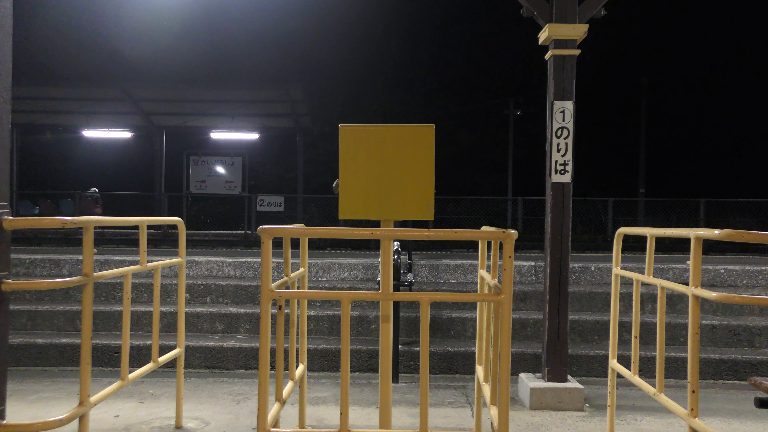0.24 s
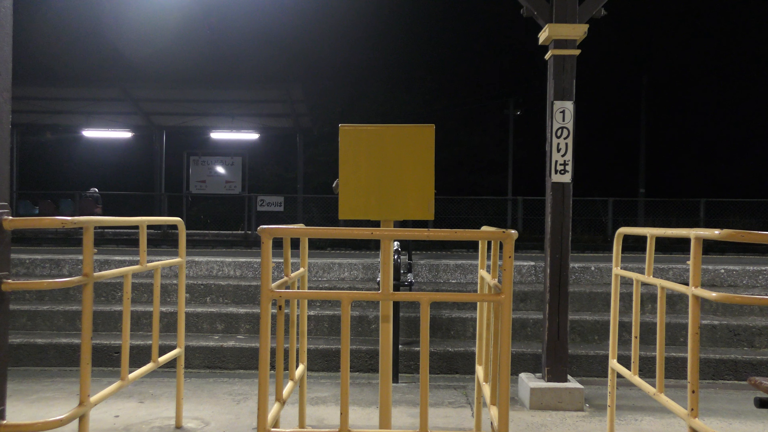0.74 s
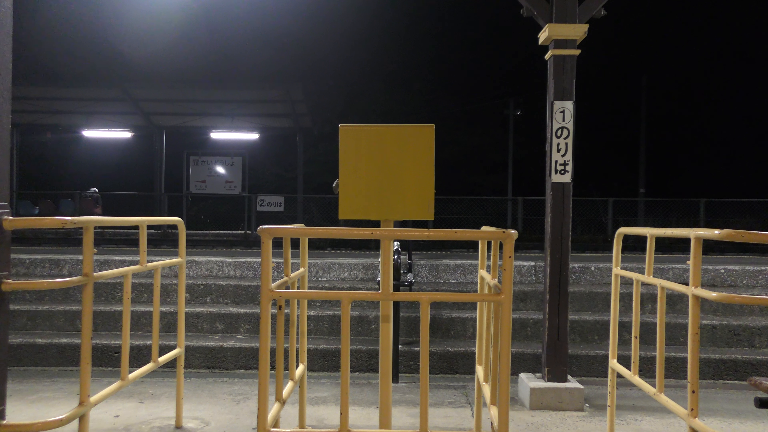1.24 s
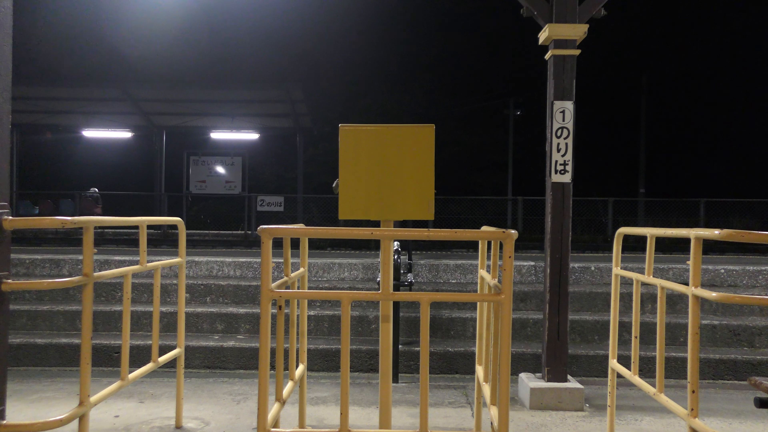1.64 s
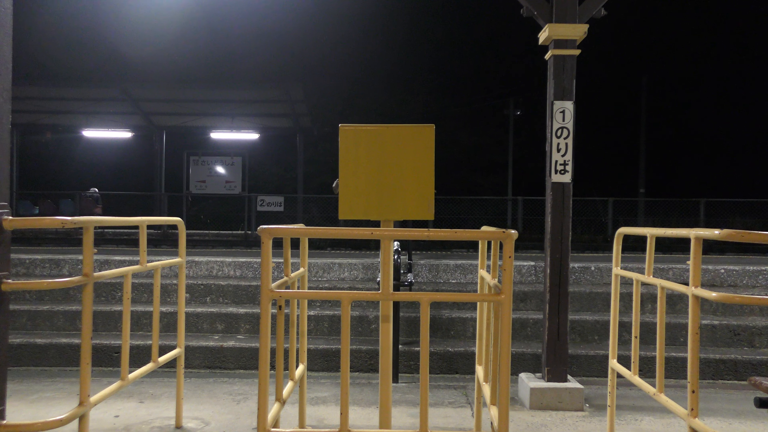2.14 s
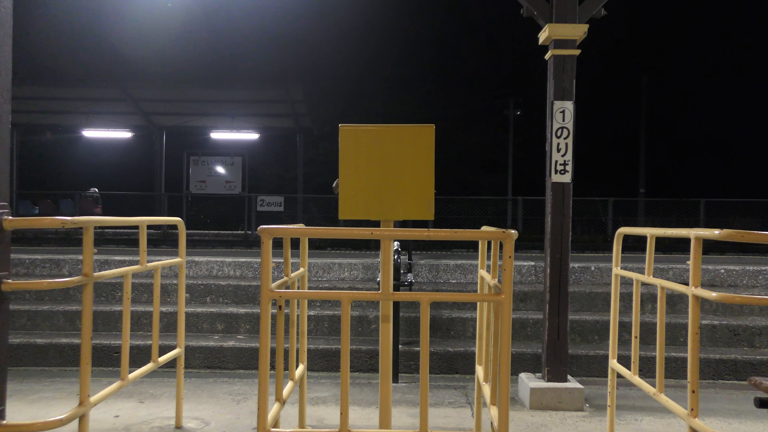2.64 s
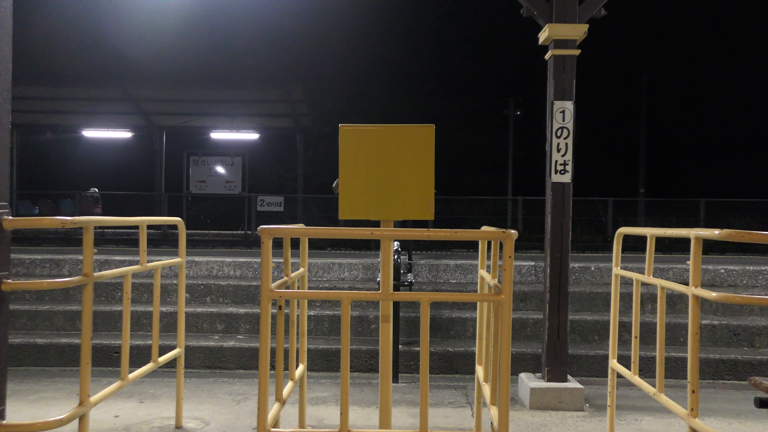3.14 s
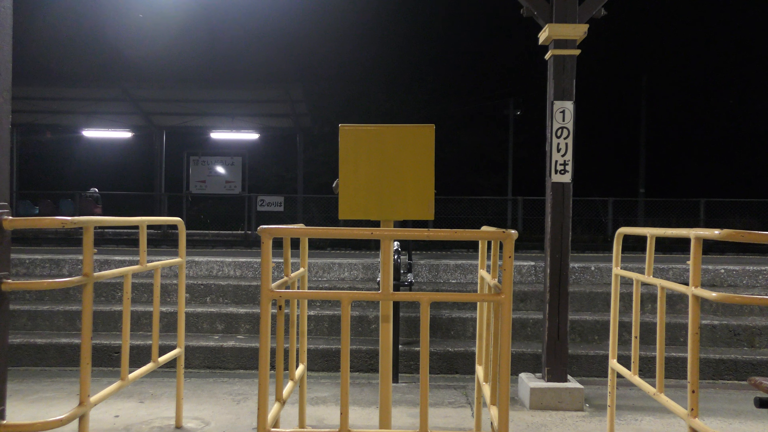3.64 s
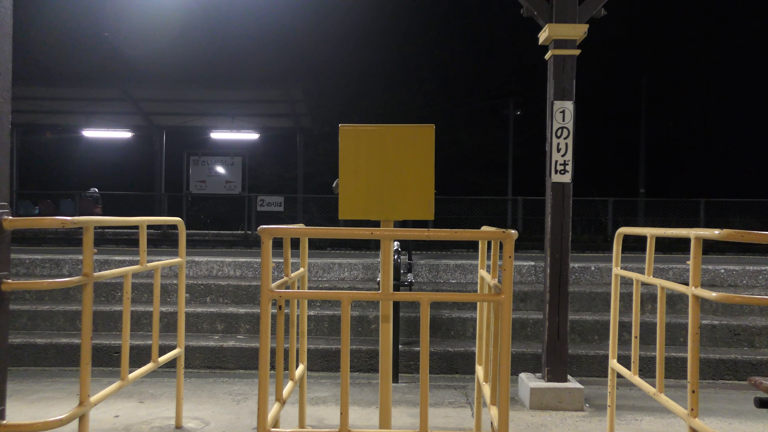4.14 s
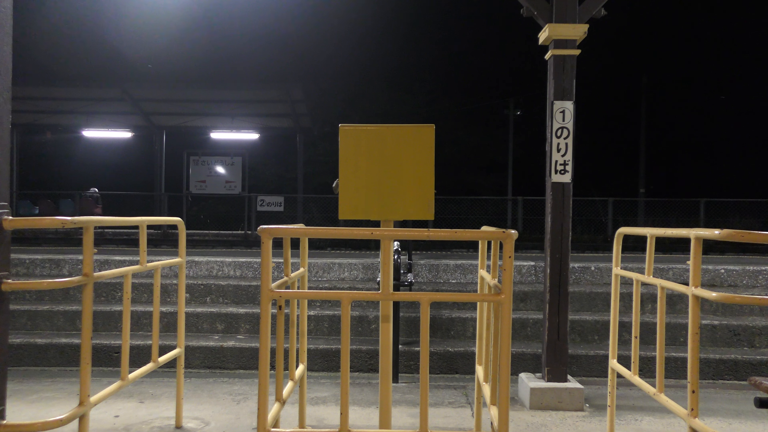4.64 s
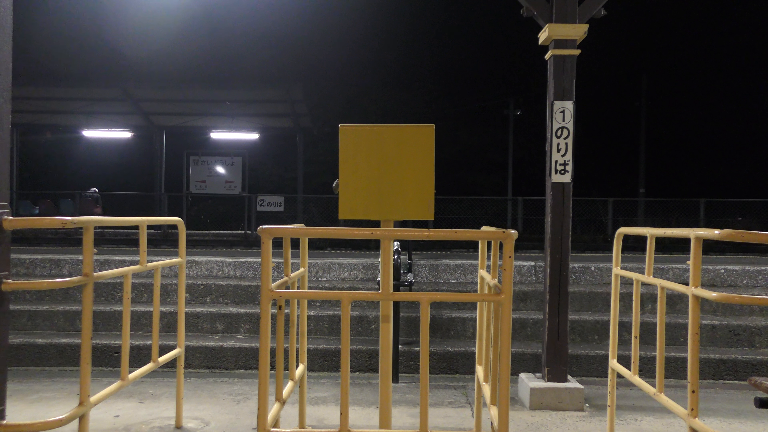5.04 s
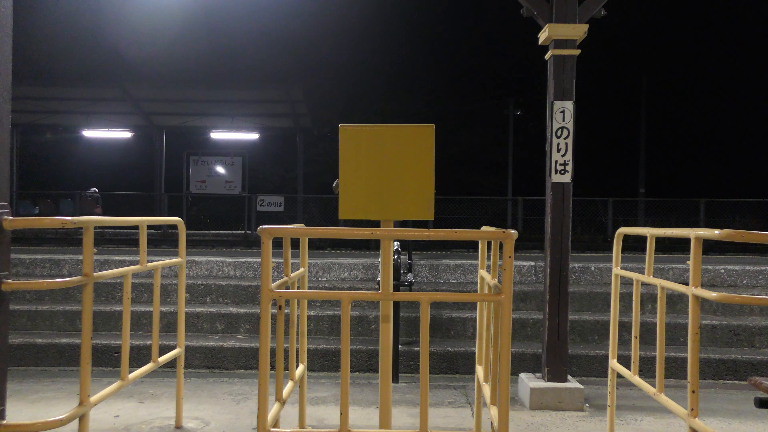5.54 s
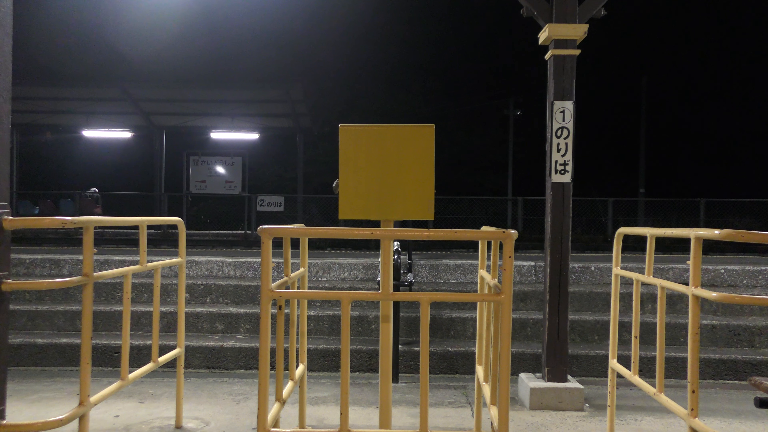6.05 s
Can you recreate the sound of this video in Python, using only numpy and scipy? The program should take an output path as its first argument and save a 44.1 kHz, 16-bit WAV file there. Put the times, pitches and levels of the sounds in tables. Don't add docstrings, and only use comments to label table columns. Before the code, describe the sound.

On a still night platform, one close cricket sings three phrases of rapid, bright chirps, each a burst of falling pulses echoing off concrete steps and walls. Behind it run a faint low trill, a soft second chirper and a high bush-cricket shimmer. Motor hum, faint lamp sizzle and rustling air stay low. Two tiny ticks sound near the end of the first phrase. A compact stereo camera microphone hears it all.

```python
import sys
import numpy as np
from scipy import signal
from scipy.fft import rfft, irfft
from scipy.io import wavfile
from scipy.ndimage import uniform_filter1d

SR = 44100
rng = np.random.default_rng(int(sys.argv[2]) if len(sys.argv) > 2 else 0)


def file_out(sig):
    cols = np.atleast_2d(sig).T
    lim = np.clip(cols, -1, 1)
    pcm = np.round(lim * 32767).astype(np.int16)
    wavfile.write(sys.argv[1], SR, pcm)


def voltage_ratio(level):
    return 10 ** (np.asarray(level, float) / 20)


N = 277830
T = np.arange(N) / SR


def level(x, db):
    return x * voltage_ratio(db) / np.sqrt(np.mean(x ** 2))


def curve(rows):
    return np.interp(T, *np.transpose(rows))


def walk(rate):
    k = int(SR / rate)
    steps = np.repeat(rng.standard_normal(N // k + 1), k)
    smooth = uniform_filter1d(uniform_filter1d(steps, k), k)
    return level(smooth[:N], 0)


def shaped(x, points):
    hz, db = np.transpose(points)
    log_hz = np.log(np.fft.rfftfreq(N, 1 / SR) + 1)
    return irfft(rfft(x) * voltage_ratio(np.interp(log_hz, np.log(hz), db)), N)


def coloured(points):
    return shaped(rng.standard_normal(N), points)


def stereo(mid, side):
    return np.array([mid + side, mid - side])


def panned(pan_db):
    return np.array([[pan_db], [-pan_db]]) / 2


def diffuse(x, t60):
    tail = rng.standard_normal(SR // 4) * np.exp(-np.log(1000) * T[:SR // 4] / t60)
    tail /= np.sqrt(np.sum(tail ** 2))
    return irfft(rfft(x) * rfft(tail, N), N)


def chorus(count, hz, spread_hz, jitter_hz, fall_hz, rate, duty, swell_db, t60, dry_db, side_db):
    heard, sung = 0, 0
    for place, (tempo, offset) in zip(np.linspace(-1, 1, count), rng.random((count, 2))):
        vigour = walk(6)
        strokes_per_s = rate * (.8 + .4 * tempo) * (1 + .06 * vigour)
        strokes = offset + np.cumsum(strokes_per_s) / SR
        detune, size, phase = rng.standard_normal((N // 100, 3))[strokes.astype(int)].T
        along = np.minimum(strokes % 1 / duty, 1)
        pitch = hz + spread_hz * place + jitter_hz * detune + fall_hz * (.5 - along)
        strength = np.sin(np.pi * along) * voltage_ratio(swell_db * vigour + 1.0 * size)
        song = strength * np.sin(2 * np.pi * np.cumsum(pitch) / SR + np.pi * phase)
        heard = heard + diffuse(song, t60) + voltage_ratio(dry_db) * song
        sung = sung + song
    return stereo(level(heard, 0), level(diffuse(sung, t60), side_db))


# time in seconds, level in dB.
TRILL_LEVEL = [
    (0.0, -58.5),
    (1.45, -57.5),
    (1.7, -55.5),
    (2.1, -55),
    (2.25, -53),
    (2.4, -56),
    (5.6, -56),
    (6.1, -54.5),
    (6.3, -57),
]
# time in seconds, number of swells counted so far.
TRILL_SWELLS = [(0.12, 0), (0.87, 3), (1.75, 7), (2.75, 11), (4.1, 17), (5.65, 24), (6.3, 27)]


def far_trill():
    song = chorus(count=5, hz=3852, spread_hz=190, jitter_hz=94.96, fall_hz=279.5, rate=44, duty=.75,
                  swell_db=1.0, t60=0.37, dry_db=-6, side_db=-8)
    throb_db = 1 * np.cos(2 * np.pi * curve(TRILL_SWELLS))
    return song * voltage_ratio(curve(TRILL_LEVEL) + throb_db)


# first chirp in seconds, last chirp in seconds, level in dB.
SECOND_CHIRPER_RUNS = [
    (0.0, 3.828, -61),
    (4.59, 6.33, -58.5),
]


def second_chirper():
    chirp_gap_s, dip_db, rest_db = .116, -8.5, -74.5
    song = chorus(count=2, hz=5320, spread_hz=98, jitter_hz=80.5, fall_hz=550, rate=130, duty=0.82,
                  swell_db=2.5, t60=0.11, dry_db=0, side_db=-6.5)
    gain = voltage_ratio(rest_db)
    for first, last, db in SECOND_CHIRPER_RUNS:
        dip = np.sin(np.pi * (T - first) / chirp_gap_s) ** 2
        singing = abs(T - (first + last) / 2) < (last - first + chirp_gap_s) / 2
        gain = gain + voltage_ratio(db + dip_db * dip) * singing
    return song * gain


def shimmer():
    song = chorus(count=4, hz=8417, spread_hz=130, jitter_hz=260.2, fall_hz=453, rate=110, duty=.65,
                  swell_db=0.0, t60=0.27, dry_db=-10.5, side_db=-15.5)
    return song * voltage_ratio(-54.5)


# pitch in Hz, level in dB.
MOTOR_TONES = [(121, -74), (334.8, -67), (400.5, -74), (482.3, -59.5), (526.2, -67.5), (632.5, -73.5),
               (669.4, -75), (1035.3, -78)]
# pitch in Hz, strength in dB per Hz.
LAMP_SIZZLE = [(12500, -16), (14400, -10), (14750, -15), (15150, -31), (15380, 0), (15800, -23)]


def machinery(wander_hz=0.647, flicker_db=1.0):
    hum = 0
    for hz, db in MOTOR_TONES:
        strength = np.sqrt(2) * voltage_ratio(db + flicker_db * walk(6))
        hum = hum + strength * np.sin(2 * np.pi * np.cumsum(hz + wander_hz * walk(5)) / SR)
    gate = np.exp(-(T * 188.3 % 1) / .35)
    sizzle_mid = level(gate * coloured(LAMP_SIZZLE) * voltage_ratio(0.99 * walk(14)), -74)
    sizzle_side = level(gate * coloured(LAMP_SIZZLE), -70)
    return stereo(hum, voltage_ratio(-23.0) * hum) + stereo(sizzle_mid, sizzle_side)


# pitch in Hz, strength in dB per Hz.
RUMBLE_MID = [(12, -42), (20, -20), (129, -6.5), (275, -8), (332, -9), (361, -12.5), (393, -7.5),
              (427, -10.5), (474, -10), (538, -12), (573, -18), (649, -14), (784, -21), (1010, -13),
              (3000, -20), (3900, -66), (6600, -120)]
# pitch in Hz, strength in dB per Hz.
RUMBLE_SIDE = [(12, -38), (20, -6), (121, 2.5), (237, 2.5), (474, -5), (573, -11.5), (784, -15.5),
               (988, -8.5), (1190, -6.5), (3000, -11.5), (3900, -46), (6600, -120)]
# pitch in Hz, strength in dB per Hz.
RUSTLE = [(2400, -87), (3100, 0.5), (4400, 1.5), (5500, 1), (6100, -6.5), (7200, -1), (9500, -0.5),
          (10100, 0), (10450, 5), (10900, 0), (11400, -4.5), (13000, -6.5), (14500, -4.5), (15700, 1.5)]


def air():
    rumble = stereo(level(coloured(RUMBLE_MID), -55.5), level(coloured(RUMBLE_SIDE), -60.5))
    rustle_mid = level(coloured(RUSTLE), -54.5) * voltage_ratio(0.8 * walk(12))
    rustle_side = level(coloured(RUSTLE), -62.0)
    return rumble + stereo(rustle_mid, rustle_side)


# time of the last wing stroke in seconds,
# share of the toothed file skipped by the first stroke, share skipped by the second.
FIRST_PHRASE = [(0.1009, 0, 0), (0.2257, 0, 0), (0.3571, 0, 0), (0.4842, 0, 0), (0.6119, 0, 0),
                (0.7402, .4, 0), (0.8698, .3, .25), (0.9979, 0, 0), (1.1229, 0, 0), (1.2515, .25, 0),
                (1.3801, .4, 0), (1.5107, .3, .35), (1.6425, .4, 0)]
SECOND_PHRASE = [(2.2732, 0, 0), (2.4017, 0, 0), (2.5293, 0, 0), (2.6589, .3, 0), (2.7845, 0, 0),
                 (2.9127, 0, 0), (3.0385, .1, 0), (3.1664, .25, 0), (3.295, .1, 0), (3.4219, 0, 0),
                 (3.5496, .35, .4)]
THIRD_PHRASE = [(4.2586, .5, 0), (4.3848, .3, .5), (4.5134, 0, 0), (4.641, 0, 0), (4.7679, 0, 0),
                (4.8922, 0, 0), (5.0193, .25, 0), (5.1464, 0, 0), (5.273, .5, 0), (5.4018, .4, 0),
                (5.5307, .4, .35), (5.6595, .35, 0), (5.7883, .35, .5)]


def wing_strokes():
    full_count, full_db, rise_db, slip_late_s = 4, -28.5, 0.74, .012
    rows = []
    for phrase in (FIRST_PHRASE, SECOND_PHRASE, THIRD_PHRASE):
        for k, (last, *slips) in enumerate(phrase):
            count = full_count if k else 3
            gap_s = .0131 if k < 2 else .01337
            skips = (slips + [0, 0])[:count]
            for n, skip in enumerate(skips, 1):
                start = last - (count - n) * gap_s + slip_late_s * skip ** 2
                rows.append((start, skip, full_db - rise_db * (full_count - n)))
    return rows


# share of the stroke done, pitch in Hz, level in dB,
# overtone level in dB, level thrown at the far walls in dB.
WING_STROKE = [
    (0, 5325, -5, -21, 10.5),
    (.25, 5428, -8.5, -26, -7),
    (.5, 5330, -3, -16, -2),
    (.7, 4986, 0.5, -18.5, -12.5),
    (.86, 4827, -3, -18.5, -3),
    (1, 4450, -22, -25, -32),
]
# delay in milliseconds, level in dB, left minus right in dB.
REFLECTIONS = [(1.93, -15.5, 11.5), (4.963, -6, -2.5), (8.0, -17, 4), (10.5, -12.5, 0), (15.87, -16, 1),
               (18.5, -35, -11), (22.2, -15, 4), (26.3, -44, -12), (30.74, -17, 0), (36, -32, -7),
               (51.4, -31, -6)]


def near_cricket(stroke_ms=9.0, lead_ms=.4, overtone_echo_db=-8, tail_db=-18):
    voice = np.zeros((3, N))
    strokes = wing_strokes()
    share, hz, *strengths = np.transpose(WING_STROKE)
    quirks = rng.standard_normal((len(strokes), 4))
    for (start, skip, stroke_db), (detune, phase, bend, size) in zip(strokes, quirks):
        along = np.linspace(0, 1, int(stroke_ms * (1 - 0.42 * skip) * SR / 1000))
        tooth = skip + (1 - skip) * along ** np.exp(.22 * bend)
        pitch = np.interp(tooth, share, hz) * (1 + 0.0061 * detune)
        turn = 2 * np.pi * np.cumsum(pitch) / SR + np.pi * phase
        gain = voltage_ratio(stroke_db - .6 + 0.63 * size) * np.sin(np.pi * along) ** .4
        i = int((start - (lead_ms + 1.5 * skip) / 1000) * SR)
        for row, db, multiple in zip(voice, strengths, (1, 2, 1)):
            row[i:i + len(along)] += gain * voltage_ratio(np.interp(tooth, share, db)) * np.sin(multiple * turn)
    tone, octave, thrown = voice * voltage_ratio(1.13 * walk(300))

    out = np.array([tone + octave] * 2)
    for ms, echo_db, pan_db in REFLECTIONS:
        echo = (tone if ms < 6.5 else thrown) + voltage_ratio(overtone_echo_db) * octave
        out += np.roll(echo, int(ms * SR / 1000)) * voltage_ratio(echo_db + panned(pan_db))
    late = np.roll(thrown + 0.35 * tone, int(.004 * SR))
    tail = stereo(diffuse(late, t60=0.43), voltage_ratio(-6.5) * diffuse(late, t60=0.31))
    return voltage_ratio(0.5) * (out + voltage_ratio(tail_db) * tail)


# time in seconds, pitch in Hz, level in dB, left minus right in dB.
LAMP_TICKS = [
    (1.3856, 6300, -41, 8),
    (1.6168, 7300, -50, 2),
]


def lamp_ticks(half_ms=0.62):
    out = 0
    for start, hz, db, pan_db in LAMP_TICKS:
        since = T - start
        ring = np.exp(-(since * 1000 / half_ms) ** 2) * np.cos(2 * np.pi * hz * since)
        out = out + voltage_ratio(db + panned(pan_db)) * ring
    return out


def scene():
    far = far_trill() + second_chirper() + shimmer()
    background = machinery() + air()
    return far + background + near_cricket() + lamp_ticks()


# pitch in Hz, level of the left-right difference in dB.
STEREO_WIDTH = [(20, 0), (5650, 0), (5800, -24), (8050, -24), (8200, 0), (8850, 0), (9050, -14),
                (10050, -11), (10250, 0), (11200, 0), (11500, -3), (16000, 0)]


def narrowed(dry, top_hz=15740):
    left, right = irfft(rfft(dry) * (np.fft.rfftfreq(N, 1 / SR) < top_hz), N)
    mid = (left + right) / 2
    side = (left - right) / 2 - 0.0072 * mid
    return stereo(mid, shaped(side, STEREO_WIDTH))


def band_limit(x):
    return signal.sosfilt(signal.butter(12, 17090, fs=SR, output="sos"), x)


def record(dry):
    mix = narrowed(dry)
    return band_limit(mix)


dry = scene()
out = record(dry)
file_out(out)
```